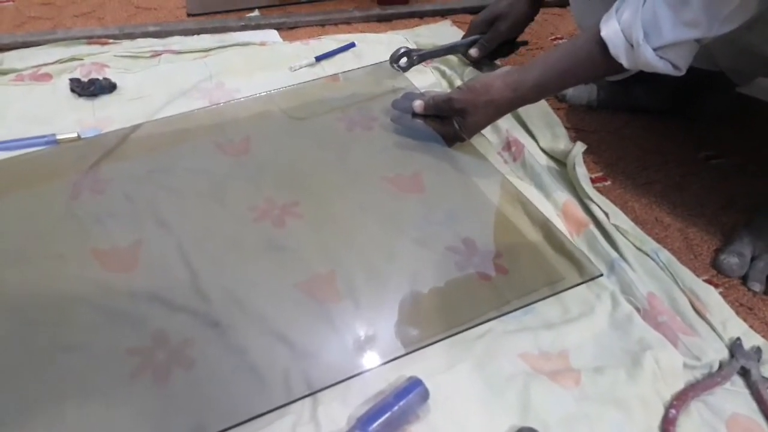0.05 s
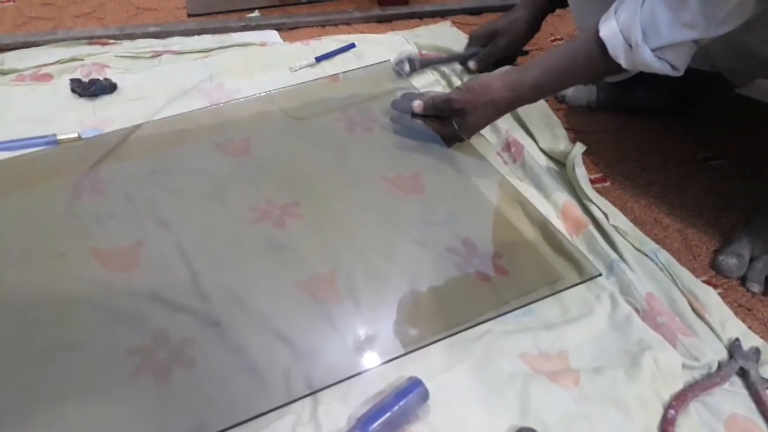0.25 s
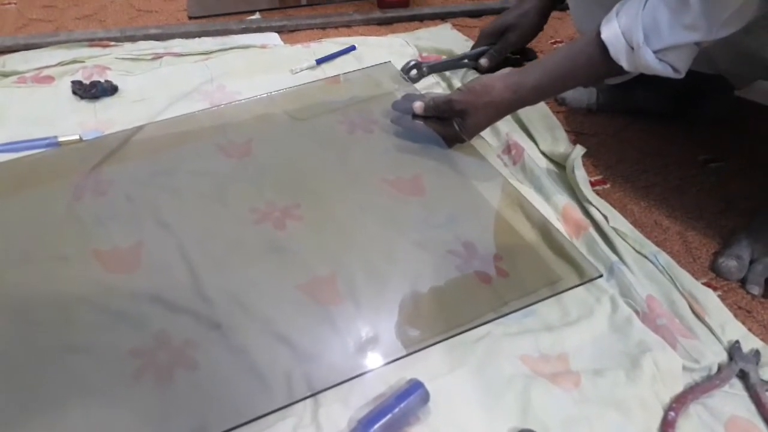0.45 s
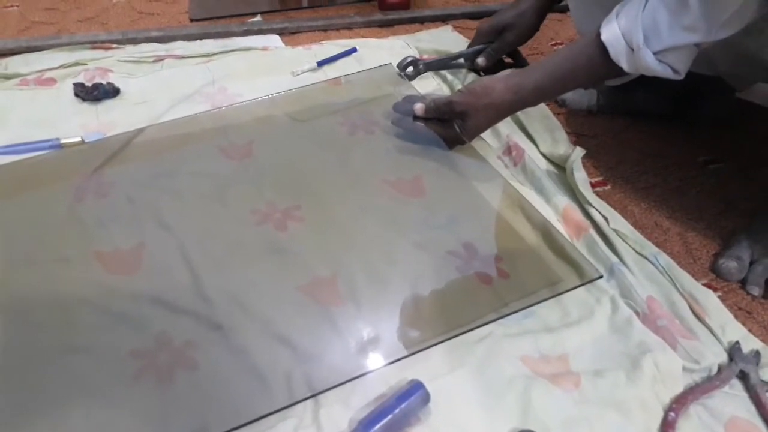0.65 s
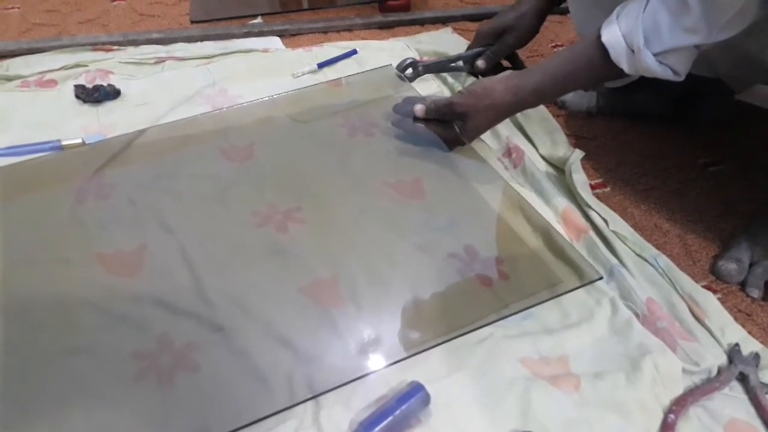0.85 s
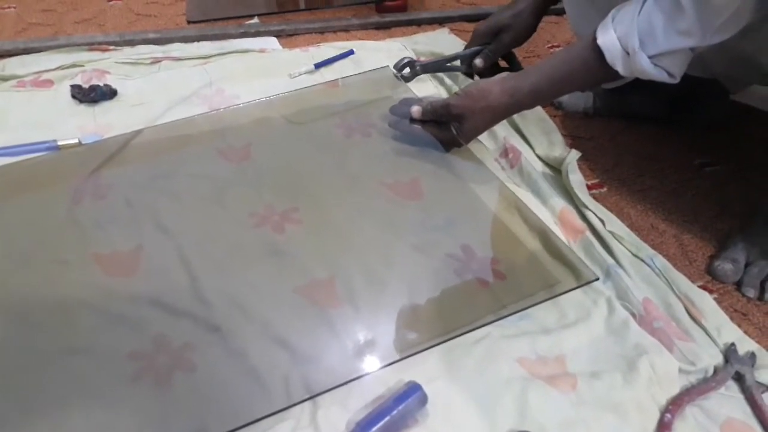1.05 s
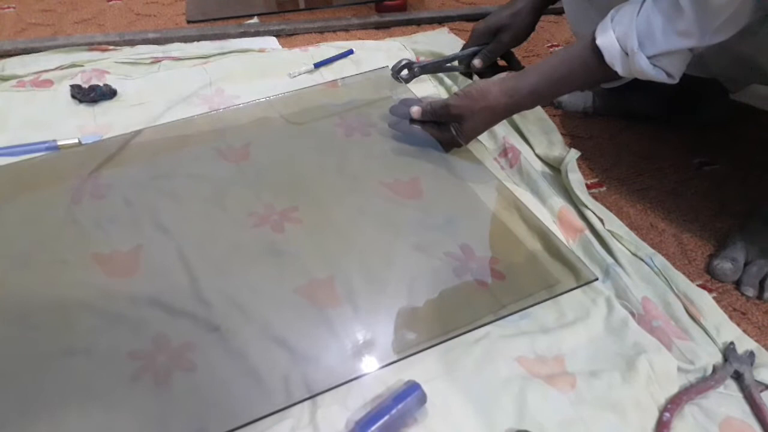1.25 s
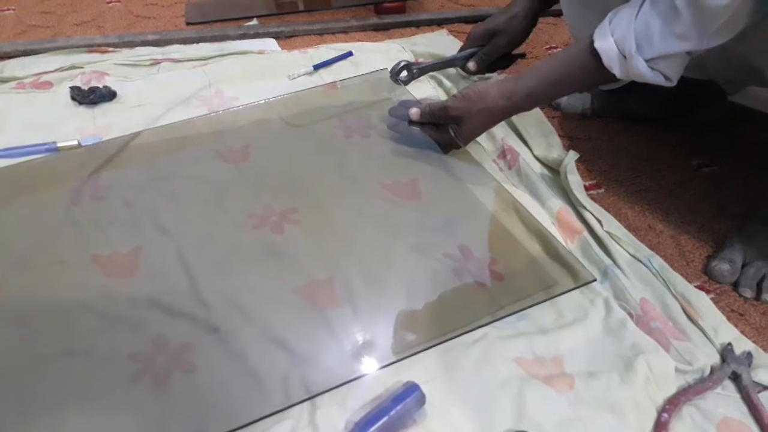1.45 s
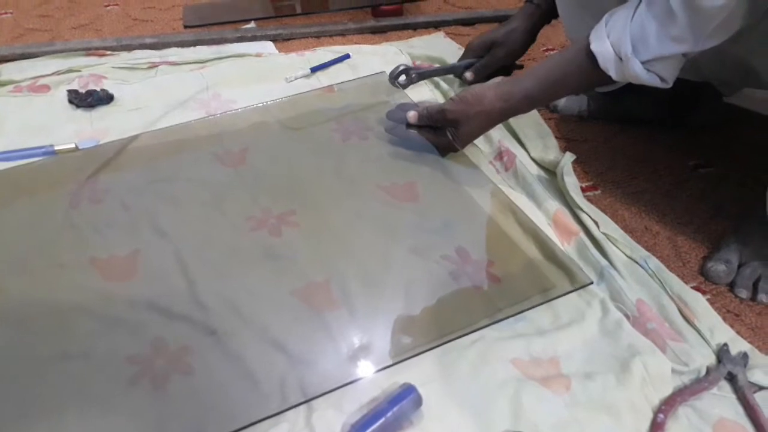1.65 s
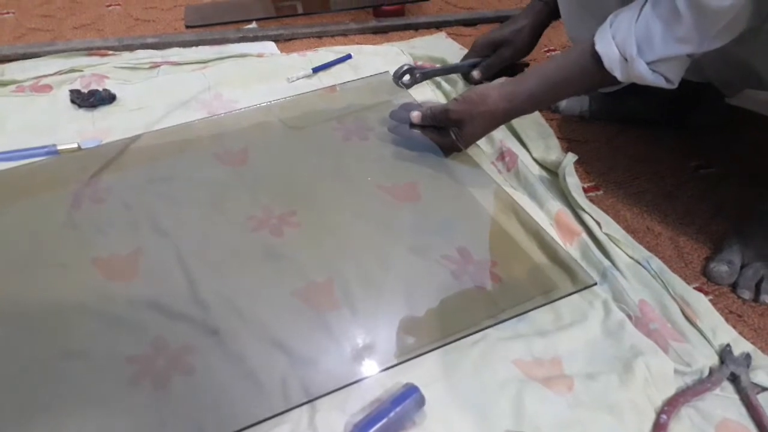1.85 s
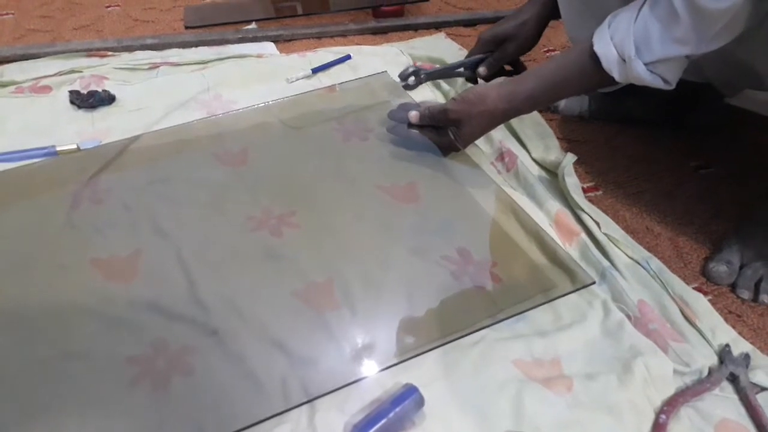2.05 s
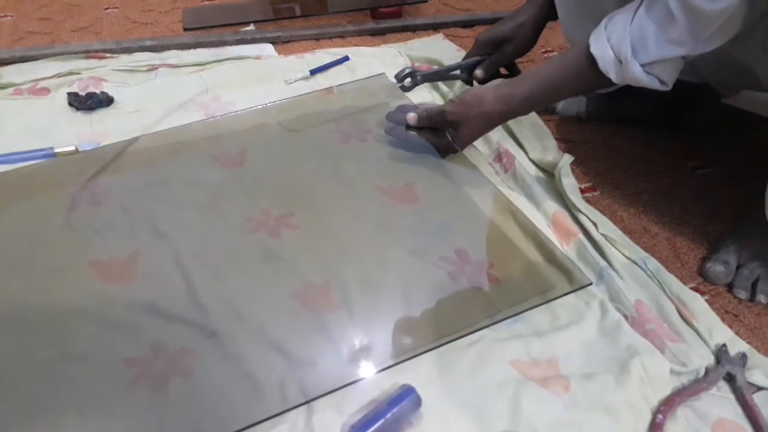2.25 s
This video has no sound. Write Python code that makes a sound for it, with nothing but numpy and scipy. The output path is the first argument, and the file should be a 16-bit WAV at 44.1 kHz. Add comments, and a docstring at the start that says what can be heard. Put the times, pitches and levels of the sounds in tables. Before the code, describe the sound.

Glass edge being nibbled by a hand tool: sharp gritty cracks, a pause, then more cracks and a snap

```python
"""A hand tool bites along the edge of a glass sheet lying on cloth, in two gritty strokes and a last snap.
Each bite is a burst of tiny fractures: filtered clicks give its crack, dull body and ringing glass.
Between and around the strokes, short bursts of clicks make knocks on the sheet, and low noise makes it
rub softly on its cloth. Nearby walls answer with a short, bright reverberation made of fading noise.
Quiet air noise lies underneath; loud moments are held down and slightly overloaded."""
import sys
import numpy as np
from scipy import signal
from scipy.io import wavfile
from scipy.ndimage import uniform_filter1d

SR = 44100
rng = np.random.default_rng(int(sys.argv[2]) if len(sys.argv) > 2 else 0)


def wrap_up_sound(samples):
    """Save the sound to the file named by the first command line argument, as 16-bit audio."""
    columns = np.atleast_2d(samples).T
    # keep every value between -1 and 1, then stretch to whole-number steps
    tamed = np.clip(columns, -1, 1)
    steps = np.round(tamed * 32767).astype(np.int16)
    wavfile.write(sys.argv[1], SR, steps)


N = 101429  # length of the scene in samples
SECOND_STROKE_S = 1.0  # bites after this time belong to the second stroke

# tone of a bite's dull body, also used for the earlier reverberation: pitch_hz, level_db
BODY_TONE = [(25, -36), (70, -19), (140, -15.5), (270, -4.5), (500, -9), (950, -8.5), (1600, -1.5),
             (2800, 1.5), (4000, -1.5), (6000, -19.5), (13000, -31.5)]


def amp(db):
    """Turns decibels into a gain."""
    return 10 ** (np.asarray(db) / 20)


def evened(x):
    """Scales a sound to an average (rms) level of 1."""
    return x / np.sqrt(np.mean(x ** 2) + 1e-20)


def lasting(x, length_s):
    """Gives x the energy of a sound of rms 1 that lasts 4 ms more than length_s."""
    energy = np.sum(x ** 2) + 1e-20
    return x * np.sqrt((length_s + .004) * SR / energy)


def read(points, hz):
    """Reads a table of (pitch_hz, value) at any pitch, along a logarithmic pitch axis."""
    pitch_hz, value = np.transpose(points)
    return np.interp(np.log(hz + 1), np.log(pitch_hz + 1), value)


def add(mix, start_s, sound):
    """Mixes a sound in at start_s, cutting off what runs past the end."""
    part = mix[max(round(start_s * SR), 0):][:len(sound)]
    part += sound[:len(part)]


def colour(x, points, tilt_db=0, size=4096):
    """Filters x to a tone without pre-echo; tilt_db per octave pivots at 2 kHz and stops below 300 Hz."""
    hz = abs(np.fft.fftfreq(size, 1 / SR))
    octaves = np.log2(np.maximum(hz, 300) / 2000)
    log_gain = np.log(amp(read(points, hz) + tilt_db * octaves))
    # this phase makes the filter respond as early as possible
    response = np.exp(np.conj(signal.hilbert(log_gain)))
    taps = np.fft.ifft(response).real[:size // 2]
    return signal.fftconvolve(x, taps)[:len(x)]


def dying(t, t60_s):
    """A fade that falls 60 dB in t60_s."""
    return np.exp(-np.log(1000) * t / t60_s)


def shift(length_s, level_db, size=20000):
    """Hands shift the sheet: noise with a soft, low tone swells and fades like a rub on the cloth."""
    # tone of the rub: pitch_hz, level_db
    rub_tone = [(30, -40), (120, 0), (250, -13), (355, 3), (460, -4.5), (800, -11), (1300, -11.5),
                (3000, -17.5), (13000, -50.5)]
    rise_s = 0.011
    t = np.arange(size) / SR
    swell = np.minimum(t / rise_s, 1) * np.exp(-(t / length_s) ** 2)
    rub = colour(rng.standard_normal(size) * swell, rub_tone)
    return amp(level_db) * lasting(rub, length_s)


def tail():
    """One second of noise whose pitch bands die away at the walls' own speeds."""
    # how long the walls hold each pitch: pitch_hz, t60_s (time to fall 60 dB)
    wall_fades = [(100, 0.3847), (400, 0.3981), (1000, 0.48), (2700, 0.4416), (4500, 0.5071),
                  (7300, 0.3523), (13000, 0.5332)]
    hz, t, bands = signal.stft(rng.standard_normal(SR), SR, nperseg=256)
    fade = dying(t, read(wall_fades, hz)[:, None])
    return signal.istft(bands * fade, SR, nperseg=256)[1]


def earlier_reverberation():
    """Reverberation still dying away at the start: a wall tail with the tone of a dull body."""
    return amp(-40.5) * lasting(colour(tail(), BODY_TONE), 0.018)


def air():
    """Quiet air: steady noise, strongest in the lows."""
    # tone of the air: pitch_hz, level_db
    air_tone = [(25, -0.5), (60, -4), (95, -0.5), (118, 8), (150, -10.5), (250, -4.5), (350, -4),
                (500, -6.5), (1000, -21), (3000, -8.5), (6000, -23.5), (13000, -39)]
    return amp(-59) * evened(colour(rng.standard_normal(N), air_tone))


def fractures(length_s, size=26000):
    """Tiny breaks: a first sharp click and a quick, irregular run of smaller ones, up or down."""
    per_s, spread_db, first_height = 1100, 4, 1.512  # heights vary by plus or minus spread_db
    jitter, strength, sign = rng.random((64, 3)).T
    at_s = (np.arange(len(jitter)) + jitter) / per_s
    height = np.sign(sign - .5) * amp(spread_db * (2 * strength - 1))
    height *= np.clip((length_s - at_s) * per_s, 0, 1)  # the run fades out at its end
    clicks = np.bincount((at_s * SR).astype(int), height, size)
    clicks[0] += first_height
    return clicks


def scatter(x, t60_s, size=3000):
    """Each click bounces about in the sheet, so fading noise smears it out."""
    smear = rng.standard_normal(size) * dying(np.arange(size) / SR, t60_s)
    return signal.fftconvolve(x, smear)[:len(x)]


def ring(x, hz, t60_s):
    """One mode (a natural way of vibrating) is struck by x and rings at its own pitch."""
    pole = dying(1 / SR, t60_s) * np.exp(2j * np.pi * hz / SR)
    return signal.lfilter([1, 0, -1], [1, -pole], x + 0j).imag


def bite(start_s, length_s, ring_db, crack_db, body_db):
    """One run of fractures drives the ringing glass, a sharp crack and a dull body."""
    # pitches of the glass modes under the tool: pitch_hz
    glass_pitches = [1635, 2440, 2990, 3570, 3710, 4185, 4440, 4635, 5005, 5170, 5400, 5450, 6270]
    # those modes, in the same order: t60_s, first_stroke_db, second_stroke_db
    glass_modes = [(0.15, -28, -28.5), (.06, -19.5, -17.5), (0.076, -26, -29), (.06, -25, -25.5),
                   (0.087, -19.5, -39.5), (0.048, -2, -6.5), (.05, -17.5, -15.5), (.05, -19.5, -41),
                   (0.086, -12, -12), (0.072, -30, -4.5), (0.11, -14.5, -29), (0.15, -29, -14.5),
                   (0.13, -20, -20.5)]
    # tone of the sharp crack: pitch_hz, level_db
    crack_tone = [(100, -10), (2000, -18), (3500, 3.5), (5200, 15.5), (6400, 0), (7100, -22), (8800, -8),
                  (10200, -17.5), (12800, -11.5)]
    clicks = fractures(length_s)
    glass = np.zeros(len(clicks))
    for hz, (t60_s, first_db, second_db) in zip(glass_pitches, glass_modes):
        mode_db = second_db if start_s > SECOND_STROKE_S else first_db
        glass += amp(mode_db) * lasting(ring(clicks, hz, t60_s), length_s)
    crack = lasting(colour(scatter(clicks, 0.0412), crack_tone), length_s)
    body = lasting(colour(scatter(clicks, 0.02644), BODY_TONE), length_s)
    return amp(ring_db) * glass + amp(crack_db) * crack + amp(body_db) * body


def sheet(length_s, place):
    """The whole sheet rings on quietly as fading sine tones, its high modes dying sooner."""
    # long modes of the sheet: pitch_hz, first_stroke_db, second_stroke_db, knocked_db
    sheet_modes = [(363.1, -26, -35.5, -18.5), (545.5, -29.5, -29.5, -26.5), (690.3, -29.5, -22, -27),
                   (874.8, -38.5, -28.5, -22.5), (1287, -25, -18, -29), (1699, -14, -18, -14.5),
                   (1930, -24.5, -30, -13), (2009, -24.5, -38, -27), (2390, -24.5, -12, -37.5),
                   (2432, -25.5, -29, -21), (3105, -29.5, -33, -24), (3400, -14, -20, -26),
                   (3584, -13.5, -10, -24.5), (3964, -23, -16.5, -12)]
    t60_at_1khz_s, damping = 0.433, 0.084  # damping: power of pitch by which the fade shortens
    t = np.arange(int(.7 * SR)) / SR
    out = np.zeros(len(t))
    for row in sheet_modes:
        hz, levels_db = row[0], row[1:]
        t60_s = t60_at_1khz_s * (1000 / hz) ** damping
        tone = np.sin(2 * np.pi * (hz * t + rng.random())) * dying(t, t60_s)
        out += amp(levels_db[place]) * lasting(tone, length_s)  # place 0, 1: strokes; 2: knock
    return out


def walls(x):
    """Walls answer x with a reverberation that builds up shortly after the direct sound."""
    # tone of the walls' answer: pitch_hz, level_db
    wall_tone = [(40, -7), (300, -1), (1000, -2), (2000, -1), (3200, 3), (4200, -9), (5300, -11),
                 (7500, -1.5), (13000, -8.5)]
    delay_s, build_s = 0.00734, 0.01608
    echo = tail()
    t = np.arange(len(echo)) / SR
    echo = echo * np.clip((t - delay_s) / build_s, 0, 1)
    echo = echo / np.linalg.norm(echo)
    return colour(signal.fftconvolve(x, echo)[:N], wall_tone)


def knock(length_s, clink_db, thud_db, tilt_db):
    """A brief chatter of clicks against the sheet, heard as a hard clink over a soft thud."""
    # tone of the hard clink: pitch_hz, level_db
    clink_tone = [(40, -27.5), (200, -16), (400, -13.5), (1000, -3.5), (1700, 0.5), (3000, -2.5),
                  (4100, 2.5), (4600, -3.5), (5300, -7), (6800, -20), (13000, -28)]
    # tone of the soft thud: pitch_hz, level_db
    thud_tone = [(40, -30.5), (300, -15.5), (450, -12), (570, 3.5), (700, -11.5), (850, 3.5), (1100, -9.5),
                 (2000, -10.5), (13000, -66)]
    blow = scatter(fractures(length_s), 0.0696)
    clink = lasting(colour(blow, clink_tone, tilt_db), length_s)
    thud = lasting(colour(blow, thud_tone), length_s)
    return amp(clink_db) * clink + amp(thud_db) * thud


def scene(bitten_db=5, knocked_db=4, tail_count=3, knock_s=0.007057):
    """Lays out all the sounds; bites take turns among three separately drawn reverberation tails."""
    # hands shifting the sheet on its cloth: start_s, length_s (sets the fade), level_db
    shifts = [(0, 0.212, -52), (1.04, 0.1566, -53), (1.223, 0.242, -44), (1.391, 0.405, -54),
              (2.088, 0.181, -54.5)]
    # bites of the tool: start_s, length_s, ring_db, crack_db, body_db, echo_db
    bites = [(.143, 0.0042, -43.5, -58, -47.5, -1.5), (0.151, 0.0103, -37.5, -40, -51.5, -1.5),
             (0.175, 0.017, -42, -42.5, -61, 14), (0.188, 0.003, -40, -34, -38.5, -3),
             (0.2056, 0.0062, -23, -22.5, -33.5, 1), (0.2285, .005, -25.5, -25, -29.5, 0),
             (0.246, 0.012, -25, -25, -39.5, 5), (0.2539, .011, -18, -17, -24.5, 2.5),
             (0.2772, 0.014, -10.5, -18, -27, 2), (0.297, 0.0071, -28.5, -27.5, -29, 6),
             (0.3295, 0.011, -13, -17.5, -22.5, 2), (0.3691, 0.0033, -19.5, -21.5, -25, 9),
             (0.386, 0.011, -19, -16, -47.5, -7), (0.4055, .007, -36.5, -21.5, -26.5, 7),
             (0.4213, .005, -12.5, -17.5, -44.5, 3), (0.43, 0.0091, -11, -15, -37.5, -34),
             (0.4496, 0.008604, -7.5, -14, -9, -2), (0.466, 0.0068, -31, -38.5, -21, 4.5),
             (1.371, 0.00568, -44, -42, -41.5, 5.5), (1.39, 0.0098, -36.5, -45, -46, 2.5),
             (1.463, 0.02, -43.5, -51, -47, 7), (1.5387, 0.0097, -27, -27, -35, 0),
             (1.567, 0.0077, -38, -36.5, -63, 14.5), (1.5834, 0.0102, -21.5, -41.5, -41.5, -19.5),
             (1.597, 0.00545, -24, -42.5, -37, 5), (1.613, .012, -37, -27, -36, 12.5),
             (1.6304, 0.0055, -12.5, -14, -23, -2.5), (1.654, 0.0127, -23, -33.5, -50.5, -6.5),
             (1.674, 0.0041, -41, -19.5, -26.5, -2), (1.7005, 0.00368, -13, -10.5, -19.5, 4.5),
             (1.7097, 0.01065, -8, -19.5, -22, 0.5), (1.7536, 0.00981, -24, -20.5, -32.5, 1),
             (1.7987, 0.00348, -25.5, -25, -35.5, 0), (1.8205, 0.00954, -24.5, -31, -29.5, -3),
             (1.8846, 0.0063, -39, -39, -65.5, 4.5), (1.927, 0.00348, -34.5, -43.5, -57.5, 9),
             (1.947, 0.013, -33, -37, -40.5, -26.5), (1.9907, 0.00319, -16, -16, -23, -2),
             (2.007, 0.00324, -15.5, -25.5, -24.5, -2.5), (2.0925, 0.01364, -38.5, -37, -35, -0.5)]
    # knocks on the sheet: start_s, clink_db, thud_db, brightness (dB per octave), echo_db
    knocks = [(0.915, -32, -36.5, -1, 0.5), (1.042, -57, -45, 5, 2.5), (1.172, -52.5, -64.5, 4.5, 2.5),
              (1.2192, -21, -55.5, 1, 2)]
    near, sent = np.zeros(N), np.zeros((tail_count, N))
    for start_s, length_s, level_db in shifts:
        add(near, start_s, shift(length_s, level_db))
    add(near, 0, earlier_reverberation())
    for k, (start_s, length_s, ring_db, crack_db, body_db, echo_db) in enumerate(bites):
        sound = bite(start_s, length_s, ring_db, crack_db, body_db)
        stroke = int(start_s > SECOND_STROKE_S)
        add(near, start_s, sound)
        add(near, start_s, amp(body_db + bitten_db) * sheet(length_s, stroke))
        add(sent[k % tail_count], start_s, amp(echo_db) * sound)
    for start_s, clink_db, thud_db, tilt_db, echo_db in knocks:
        sound = knock(knock_s, clink_db, thud_db, tilt_db)
        add(near, start_s, sound)
        add(near, start_s, amp(clink_db + knocked_db) * sheet(knock_s, 2))
        add(sent[0], start_s, amp(echo_db) * sound)
    sound = near + sum(walls(share) for share in sent) + air()
    return np.array([sound, sound])


def limit(dry, limit_db=-11, recover_db_per_s=350, slope=0.417):
    """Turns loud moments down by slope dB for each dB over the limit, then quickly recovers."""
    power = uniform_filter1d((dry ** 2).mean(0), size=90)
    power_db = 10 * np.log10(abs(power) + 1e-12)
    fall_db = np.arange(N) * recover_db_per_s / SR
    # follows each peak at once, then sinks at the recovery speed
    peak_db = np.maximum.accumulate(power_db + fall_db) - fall_db
    over_db = np.maximum(peak_db - limit_db, 0)
    return dry / amp(slope * uniform_filter1d(over_db, size=45))


def overload(held, lopsided=0.014, knee=0.28):
    """Squaring bends the wave lopsidedly and adds a low flutter; peaks above the knee are rounded off."""
    high_pass = signal.butter(1, 25, "high", fs=SR, output="sos")
    bent = held + lopsided * signal.sosfilt(high_pass, held ** 2)
    over = np.maximum(abs(bent) - knee, 0)
    rounded = (1 - knee) * np.tanh(over / (1 - knee))
    return np.sign(bent) * (np.minimum(abs(bent), knee) + rounded)


def widen(mid, size=256):
    """Makes left and right differ, almost only in the top treble, by a scattered side signal."""
    # how strong the side is against the middle: pitch_hz, level_db
    side_tone = [(20, -61.5), (3500, -66), (4800, -39.5), (6500, -13.5), (9000, -10.5), (13000, -18.5)]
    spread = rng.choice([-1., 1.], size) / np.sqrt(size)
    side = colour(signal.fftconvolve(mid, spread, "same"), side_tone)
    return np.array([mid + side, mid - side])


def record(dry):
    """Limits, overloads and widens the sound, then cuts the highest treble."""
    wide = widen(overload(limit(dry)).mean(0))
    low_pass = signal.firwin(201, 13150, window=("kaiser", 9), fs=SR)  # cutoff in Hz
    return signal.oaconvolve(wide, low_pass[None], "same")


dry = scene()
out = record(dry)
wrap_up_sound(out)
```